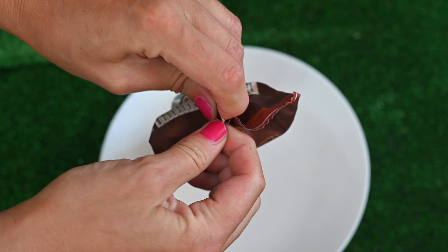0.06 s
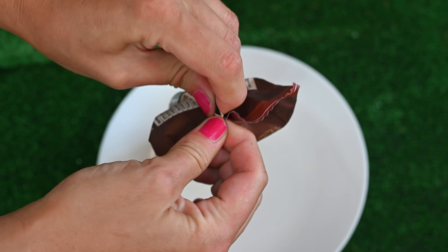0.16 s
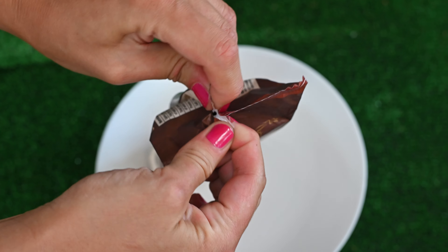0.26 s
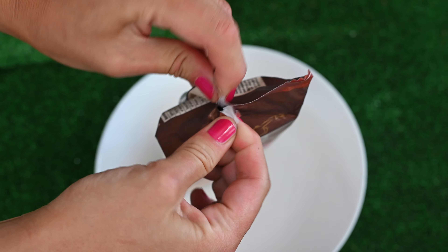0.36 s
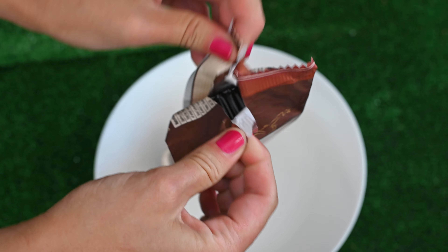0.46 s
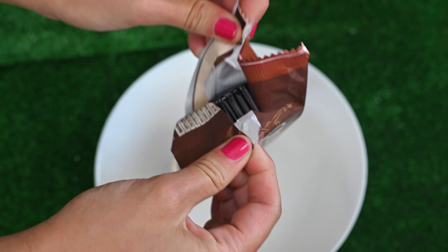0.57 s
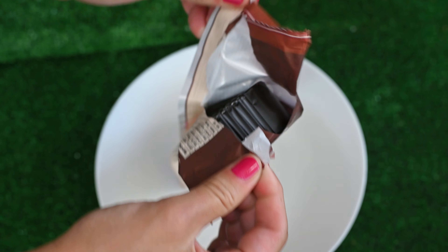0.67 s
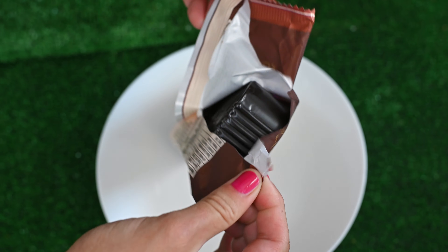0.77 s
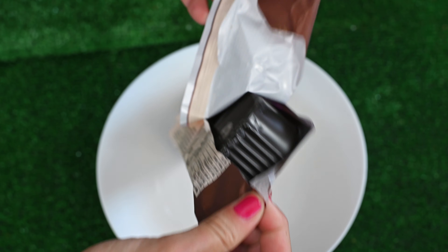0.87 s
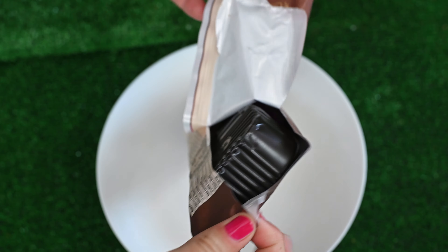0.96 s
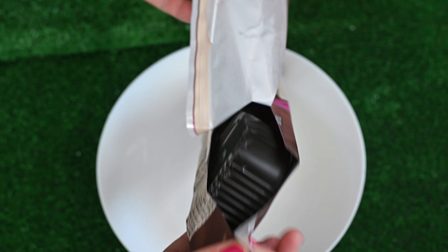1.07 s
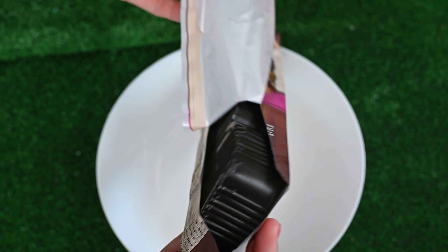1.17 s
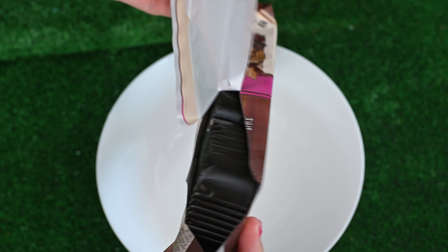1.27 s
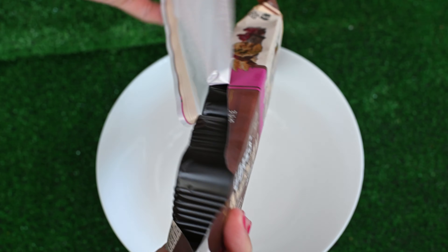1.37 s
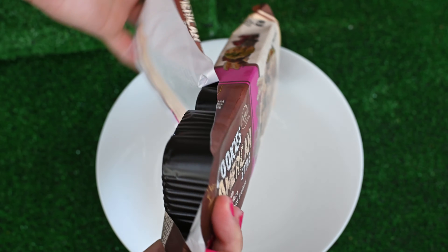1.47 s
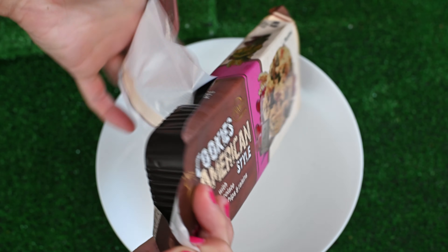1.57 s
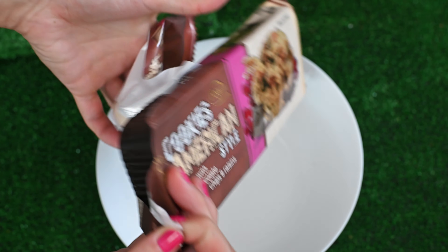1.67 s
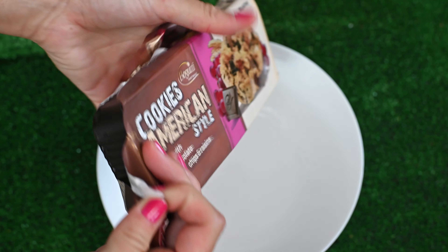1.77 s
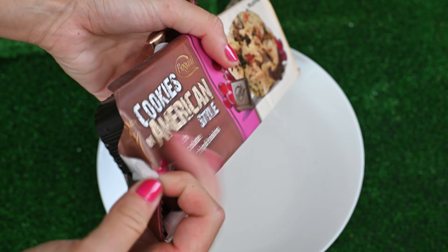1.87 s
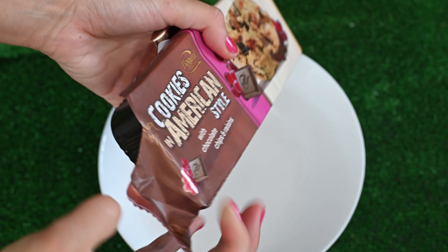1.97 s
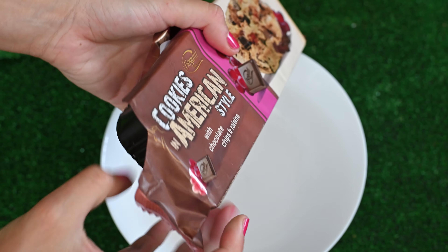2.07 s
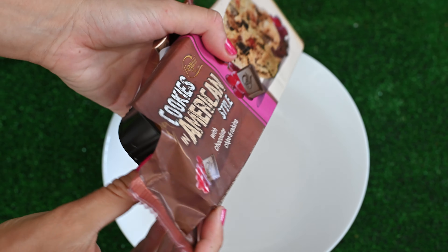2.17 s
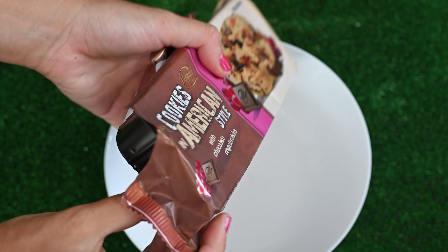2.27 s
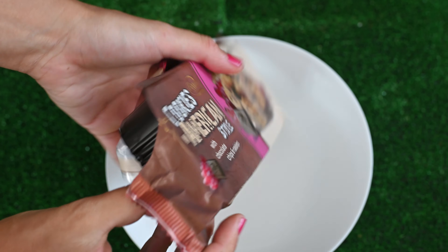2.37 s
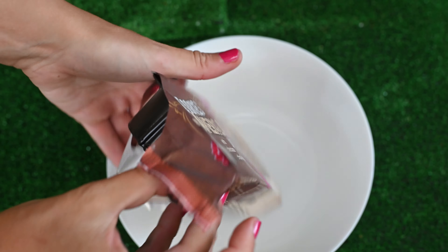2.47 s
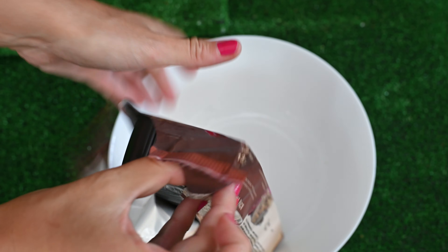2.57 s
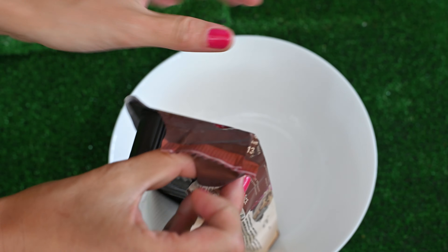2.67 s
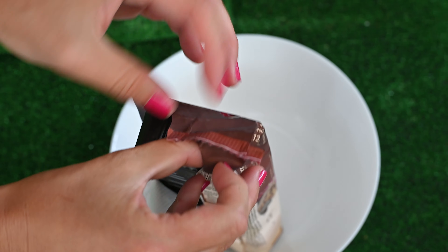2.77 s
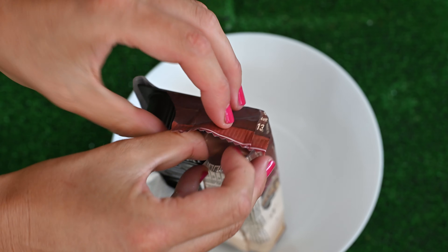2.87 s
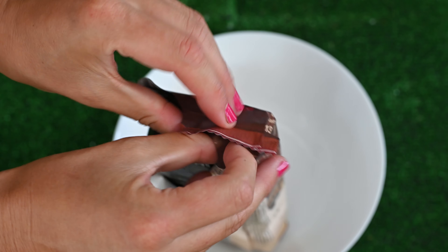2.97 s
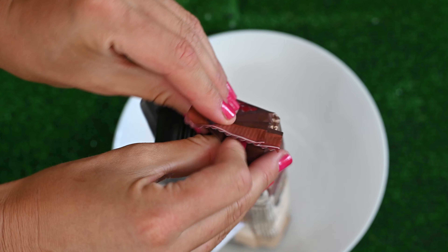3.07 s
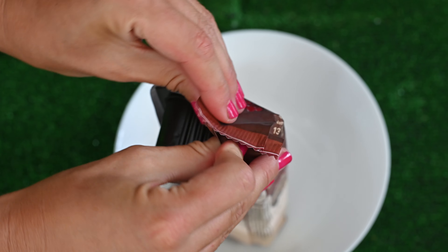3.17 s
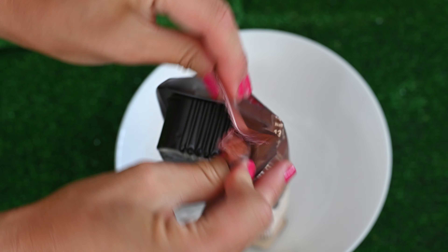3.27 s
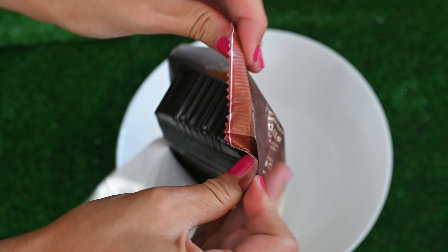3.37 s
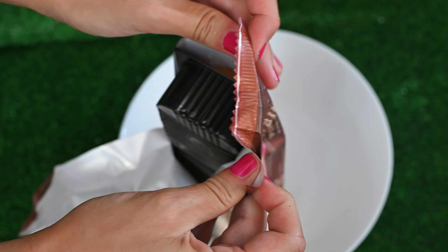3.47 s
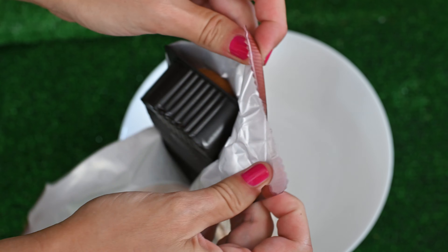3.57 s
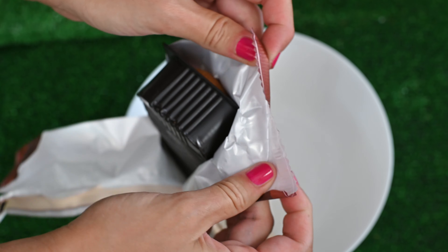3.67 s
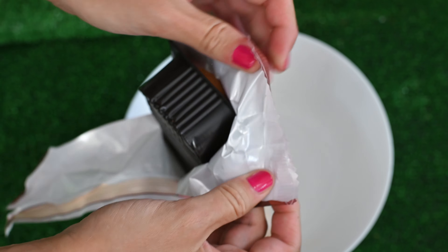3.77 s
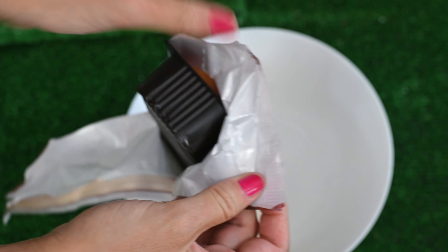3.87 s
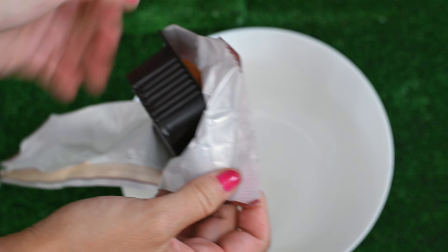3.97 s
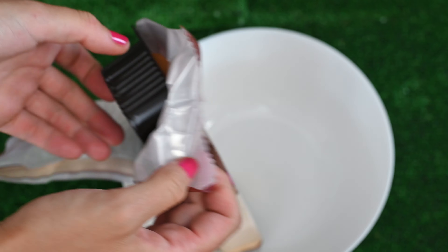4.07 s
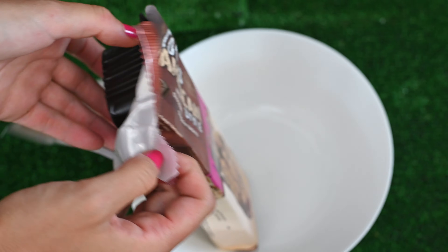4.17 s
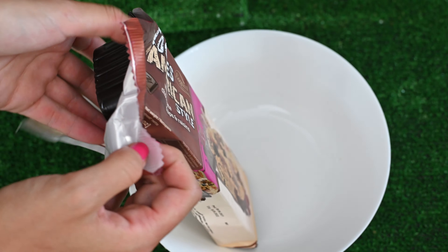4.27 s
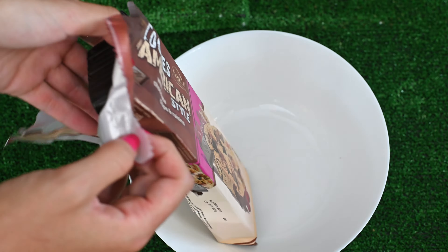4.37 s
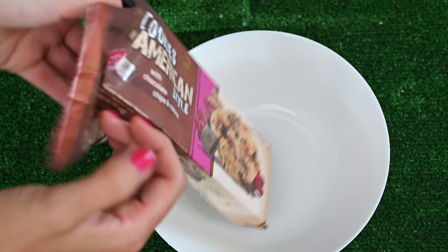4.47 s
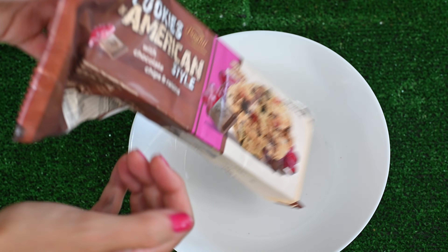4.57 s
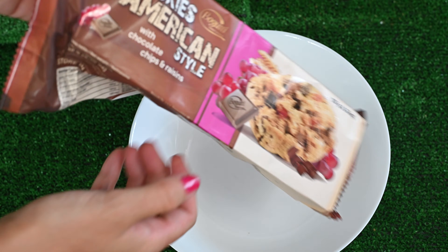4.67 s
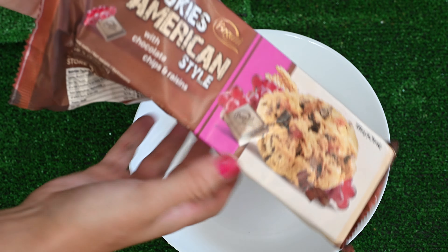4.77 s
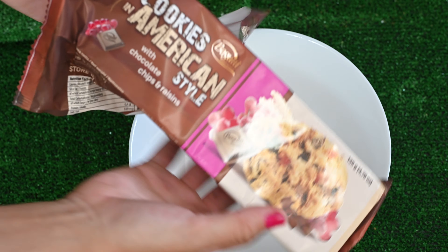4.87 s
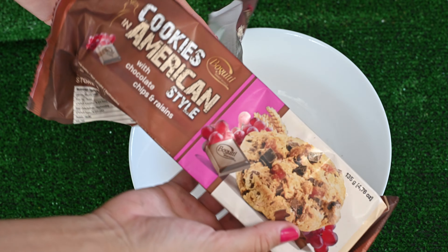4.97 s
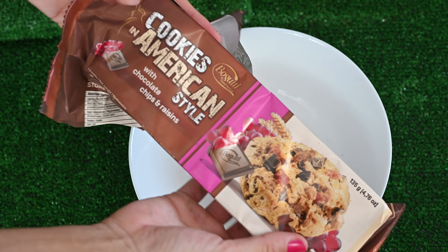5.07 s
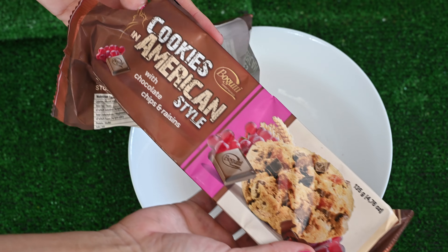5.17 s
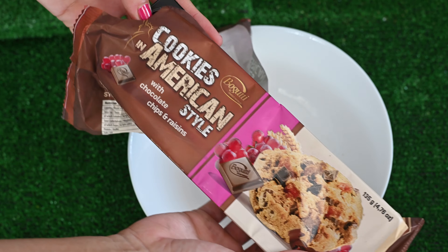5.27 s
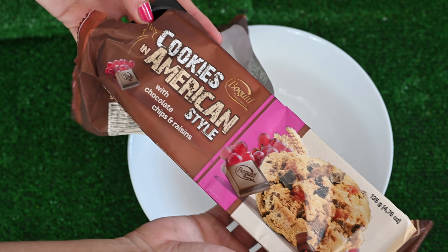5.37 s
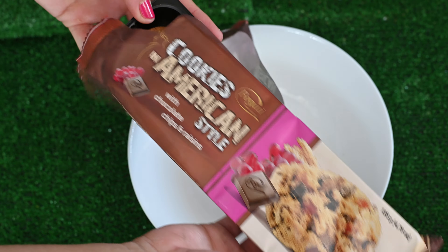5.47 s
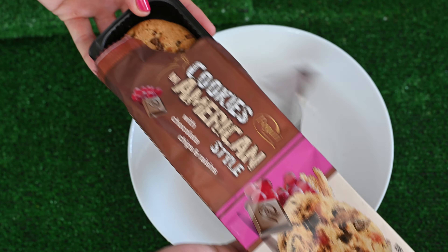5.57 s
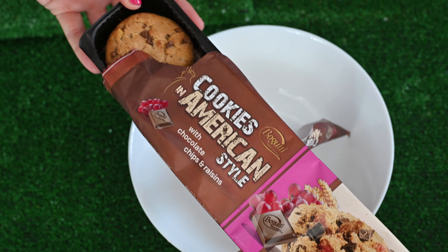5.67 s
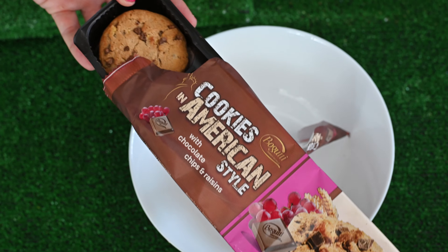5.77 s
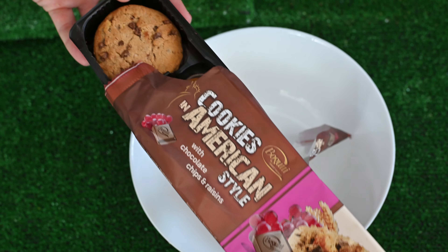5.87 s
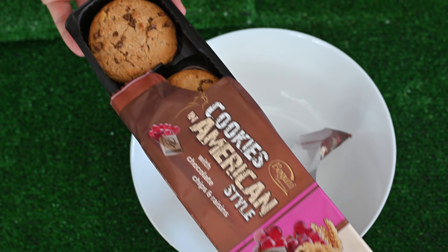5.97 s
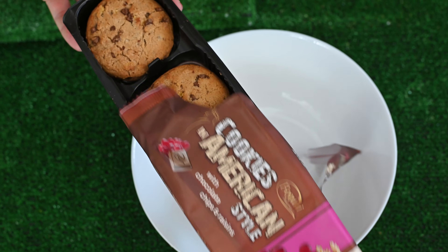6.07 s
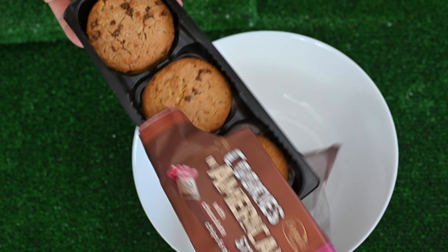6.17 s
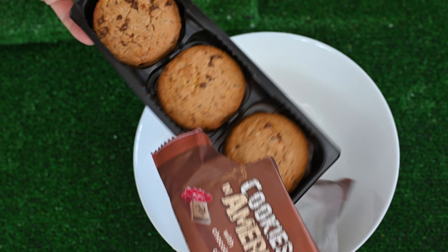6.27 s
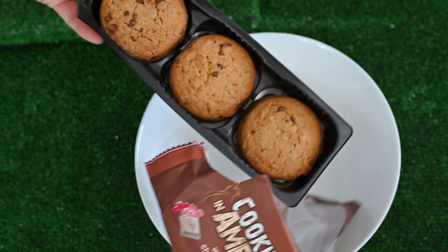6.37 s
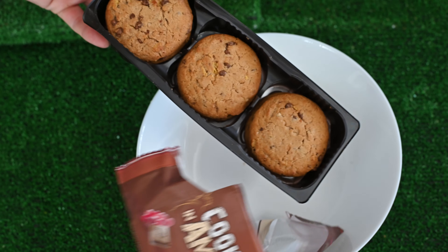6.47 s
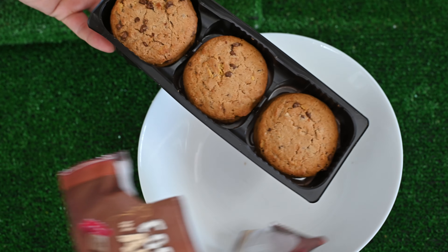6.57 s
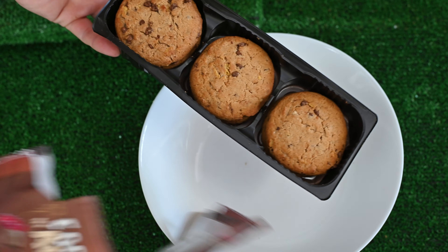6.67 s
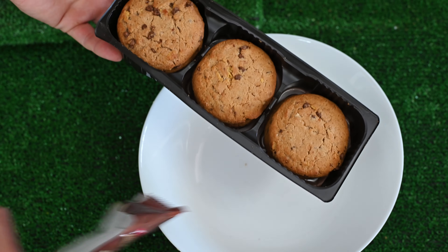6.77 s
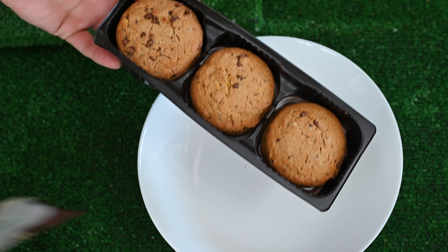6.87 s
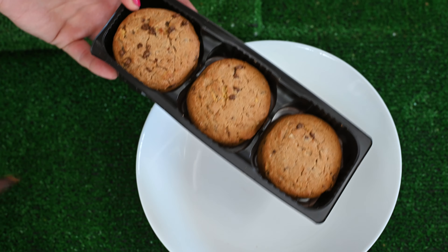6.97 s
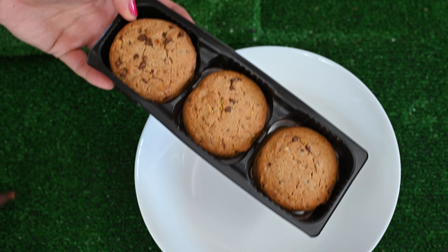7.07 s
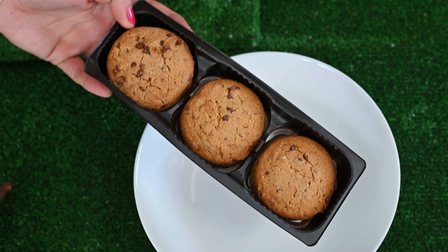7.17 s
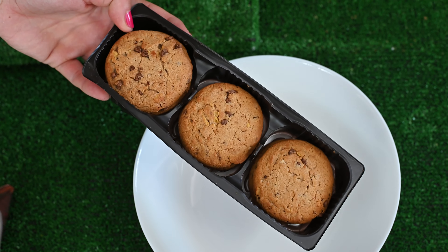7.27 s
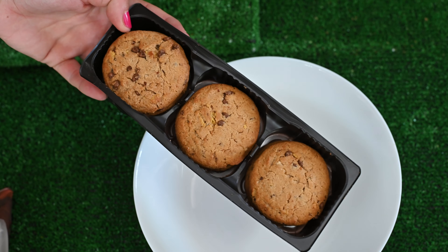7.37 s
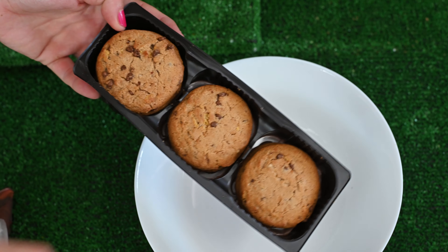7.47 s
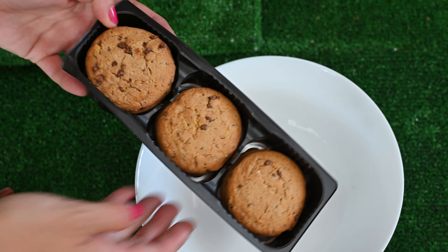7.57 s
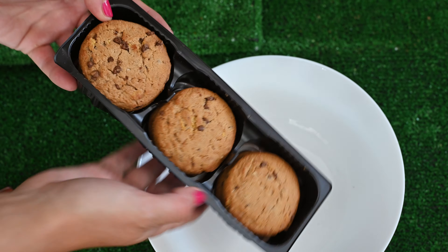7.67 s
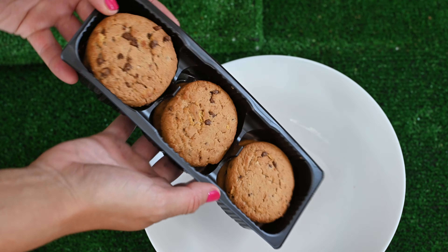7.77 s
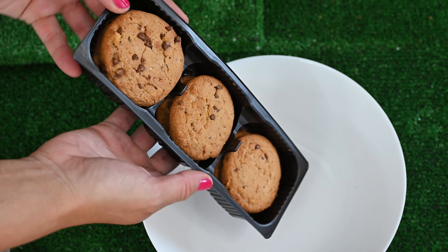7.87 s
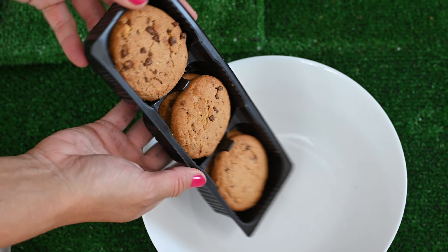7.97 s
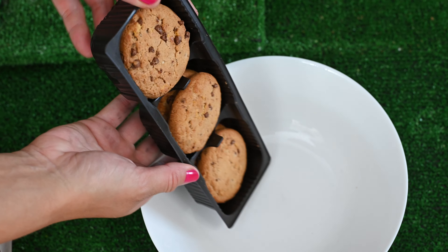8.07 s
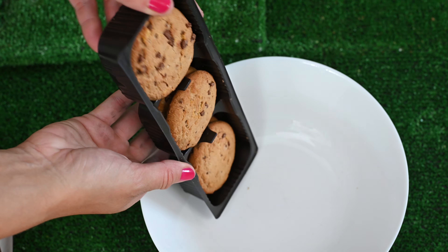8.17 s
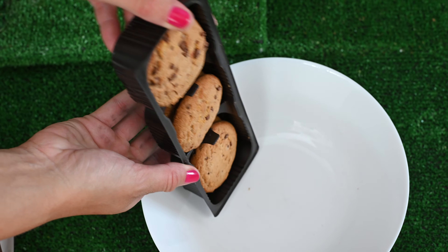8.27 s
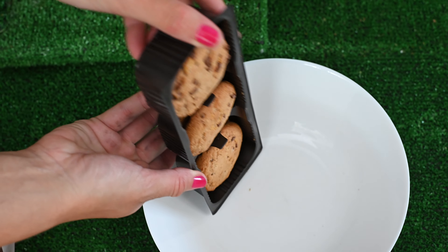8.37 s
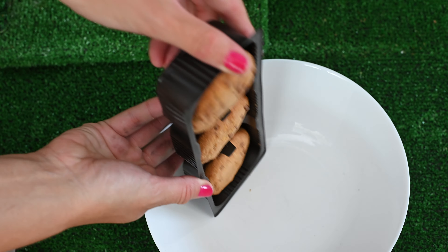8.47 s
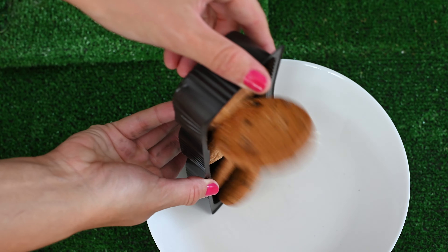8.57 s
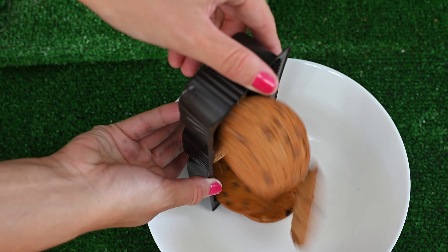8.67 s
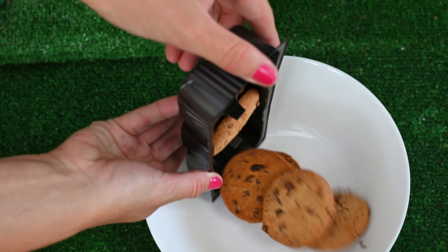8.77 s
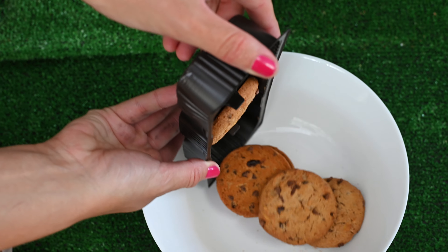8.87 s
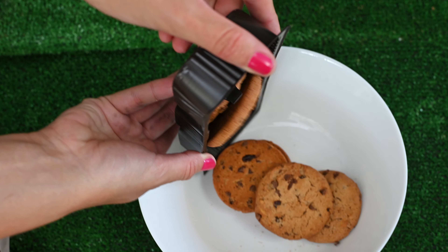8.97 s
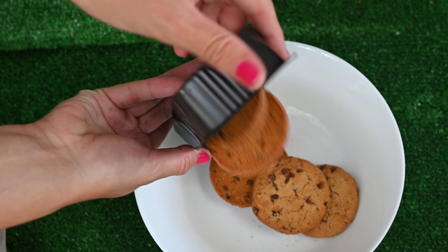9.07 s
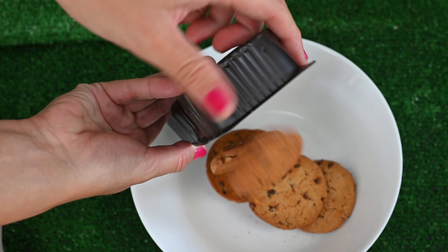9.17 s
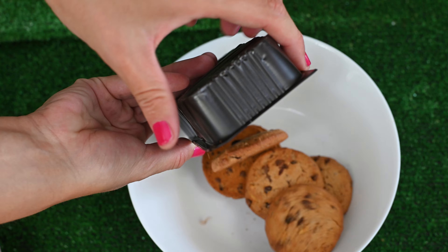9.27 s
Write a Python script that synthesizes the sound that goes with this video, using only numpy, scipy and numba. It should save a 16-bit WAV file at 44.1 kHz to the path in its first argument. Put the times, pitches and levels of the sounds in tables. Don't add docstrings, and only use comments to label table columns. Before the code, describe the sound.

Hands tear and crumple a crackly foil-lined wrapper close up, slide out a thin plastic tray, then biscuits tumble clattering into a ringing china bowl.

```python
import sys
import numpy as np
from scipy import signal
from scipy.fft import rfft, irfft
from scipy.io import wavfile
from scipy.ndimage import uniform_filter1d
from numba import njit

SR = 44100
rng = np.random.default_rng(int(sys.argv[2]) if len(sys.argv) > 2 else 0)


def dump_mix(stems):
    frames = np.atleast_2d(stems).T
    limited = np.clip(frames, -1, 1)
    pcm = np.round(limited * 32767).astype(np.int16)
    wavfile.write(sys.argv[1], SR, pcm)


def gain_from_db(level_db):
    decades = np.asarray(level_db, float) / 20
    return 10 ** decades


N = 410571

# start_s, peak_db, strongest_mode_hz, highs_db (against the peak)
TEAR_SNAPS = [(0.1353, -26.5, 4700, 1), (0.1582, -28, 3190, 2), (0.1788, -30, 5090, 7),
              (0.2038, -34, 4750, 8), (0.2348, -15.5, 4830, -4), (0.296, -5, 3040, -10.5),
              (0.3204, -24.5, 4950, 4), (0.3451, -18.5, 5430, -14), (0.3554, -12, 10500, -15),
              (0.392, -17.5, 4600, -11), (0.402, -31, 5620, 9), (0.4194, -24, 4440, -6),
              (0.455, -14.5, 5550, 3), (0.4669, -19.5, 4500, 5.5), (0.479, -22, 4650, -2),
              (0.491, -17.5, 4850, 0), (0.5138, -21.5, 3200, 1), (0.641, -20.5, 1830, -4),
              (0.6708, -18, 5800, -6), (0.7199, -13, 4530, 0), (0.746, -19, 4820, -16),
              (0.754, -11, 4500, -4), (0.7941, -13, 4860, 3), (0.8403, -12.5, 7820, -0.5),
              (0.863, -16.5, 1230, -9), (0.894, -12.5, 3900, -5), (0.9198, -9, 5300, 0.5),
              (0.957, -12.5, 1160, -14), (1.0048, -24.5, 4500, -5)]
TURN_SNAPS = [(1.0605, -19.5, 5350, 0.5), (1.1001, -18.5, 5640, -7), (1.188, -22.5, 890, -12),
              (1.2111, -11.5, 1840, -25), (1.212, -15, 4360, -13), (1.2113, -50, 900, -11),
              (1.25, -28, 5300, 0), (1.403, -25.5, 5300, 1), (1.434, -13.5, 4100, -15),
              (1.4962, -11, 2230, -6), (1.5106, -23.5, 8780, 2), (1.5507, -19, 4640, -5),
              (1.616, -21.5, 4820, 2), (1.6432, -15.5, 5100, 5.5), (1.646, -29, 5860, -14),
              (1.6715, -19.5, 5400, -3), (1.75, -17.5, 2360, -2.5), (1.8267, -20, 3780, -9),
              (1.8593, -18, 10600, -8), (1.9249, -21, 2450, -4), (1.9524, -21.5, 5460, 0),
              (2.0269, -22, 2260, -2.5), (2.2567, -27.5, 6100, 3), (2.269, -23.5, 8000, 11.5),
              (2.45, -27, 6800, 3), (2.456, -12.5, 9200, -13), (2.6066, -25.5, 2020, -2),
              (2.7113, -23, 1270, -3), (2.8212, -30, 2550, 0)]
OPEN_SNAPS = [(3.053, -21.5, 9200, -2), (3.101, -29.5, 9000, -10), (3.2406, -24, 4000, -10),
              (3.3251, -16, 5370, -4), (3.3315, -11, 4250, -1), (3.3772, -11.5, 5350, 0),
              (3.406, -15.5, 4470, 5), (3.4883, -18.5, 5850, -6), (3.5767, -33, 4930, -6),
              (3.598, -17, 5700, -1), (3.6207, -22, 5250, -8), (3.6353, -15.5, 3900, -8),
              (3.672, -19, 5600, -6), (3.7127, -16, 4140, -30), (3.7647, -23.5, 1830, -32),
              (3.83, -19.5, 10800, -5.5), (3.9016, -31.5, 4020, -41), (4.0331, -29.5, 4400, -30),
              (4.1565, -18.5, 5100, 8), (4.199, -19, 8640, -3), (4.2053, -17, 5150, -1),
              (4.319, -24.5, 4270, -2.5), (4.394, -23, 3260, -5.5), (4.43, -21.5, 1380, -19),
              (4.5978, -19, 2420, -15), (4.6423, -13, 5500, -1), (4.6499, -9, 4750, 3.5)]
PULL_SNAPS = [(4.9599, -25.5, 4900, -10), (5.05, -25.5, 2720, -43), (5.1213, -23, 5400, -28),
              (5.1498, -23.5, 5430, -5), (5.324, -20.5, 9300, 0), (5.3386, -20, 2500, -23),
              (5.3464, -18, 2960, -15), (5.4522, -23, 8850, -16), (5.5275, -14, 5230, -15),
              (5.545, -21.5, 6000, 1), (5.569, -23, 10300, 4.5), (5.702, -22.5, 5500, 0),
              (5.9087, -19.5, 6440, -5.5), (5.958, -24.5, 1410, -5), (6.0118, -27, 9700, 3),
              (6.134, -32.5, 9000, 5), (6.1927, -26, 1410, -1), (6.2108, -13.5, 1480, -7),
              (6.3199, -13.5, 6420, -8)]
TRAY_SNAPS = [(6.463, -34.5, 1830, -54), (6.537, -29, 1760, -76), (6.808, -43.5, 9350, 12.5),
              (6.8625, -28, 1180, -16), (6.865, -42, 5260, -2), (6.9055, -28.5, 890, -16),
              (6.952, -43, 900, -36), (6.978, -26, 4070, -10), (7.08, -40, 895, -20),
              (7.175, -29, 2800, -64), (7.279, -35.5, 3200, -3), (7.32, -33, 1850, -7),
              (7.583, -19.5, 2200, -9), (7.7324, -17, 1890, -8), (7.772, -32.5, 1390, -10),
              (7.8355, -30, 1820, -34), (7.8488, -22.5, 5700, -14), (7.906, -14, 2330, -13),
              (8.0372, -24.5, 2530, -13), (8.1723, -38.5, 3680, -6), (8.554, -39, 5600, -22),
              (8.6597, -27, 2650, -1.5), (8.6816, -24.5, 2280, -10), (8.685, -28, 1820, -17),
              (8.69, -38, 1390, -17), (8.694, -27, 1080, -19), (9.107, -42, 2300, -8),
              (9.258, -3, 5800, -7), (9.261, -6, 1900, -10)]
# start_s, peak_db (before TICK_DB), strongest_mode_hz, highs_db
TICKS = [(0.0097, -24.0, 5640, 2.5), (0.0218, -21, 7750.0, -4.0), (0.0598, -18, 7800, -5),
         (0.0842, -25, 9800, 6), (0.1466, -30, 5560.0, 5), (0.193, -23, 3320.0, 6),
         (0.2137, -21, 2560.0, 8), (0.3755, -16, 1300, -20.0), (0.5153, -13, 3290.0, -4.0),
         (0.5383, -10.5, 2400, -10), (0.5627, -12, 3680, -2), (0.6907, -10, 1200, -6),
         (0.8176, -18, 4780, -4), (0.825, -6.5, 2380, -8.0), (0.883, -19, 1330, -8.0),
         (0.9901, -16, 2670.0, 0), (1.2482, -17, 4600, -13), (1.3021, -16, 2220.0, -0.5),
         (1.4841, -17, 5450.0, -9.0), (1.526, -20, 1160.0, -21.0), (1.534, -17.0, 4350, -11.0),
         (1.5441, -24, 3790.0, -15.0), (1.585, -14, 1150, -7), (1.594, -14.5, 8480.0, -7),
         (1.671, -20, 1980, -17), (1.7396, -21, 1660, -6), (1.9321, -15.5, 2410.0, -7.0),
         (2.2197, -24, 990.0, -28), (2.297, -12.5, 1410, -25), (2.415, -15, 1244, -7),
         (2.5, -23.0, 3010.0, -12), (2.5055, -17, 1080, -22), (2.5244, -14, 1960.0, -15),
         (2.6272, -19, 1140, -5.0), (2.6388, -15, 720, -29), (2.8106, -24, 1090, -23),
         (2.92, -23.5, 1910, -15), (2.9875, -23, 1340, -13), (3.012, -26, 1260, -21.0),
         (3.1154, -21.5, 1880, -9.0), (3.1683, -22, 4630, -6.0), (3.179, -20.5, 1980, -19),
         (3.1886, -24, 1230.0, -20), (3.2794, -16.5, 1270, 1), (3.303, -13, 5400, -6),
         (3.3156, -15, 5770.0, 0), (3.354, -9, 5320.0, -1), (3.3958, -26, 8870.0, -5),
         (3.4268, -10, 860, -8.0), (3.467, -18.5, 860.0, 2), (3.5336, -19.5, 960, -3),
              (3.5605, -23, 870, -24), (3.5873, -12.5, 745, 0), (3.5926, -18, 915, -17.0),
              (3.737, -19, 750.0, 5.5), (3.7741, -21, 5810.0, -16), (3.7839, -30, 1790.0, -25.0),
              (3.811, -19.5, 5750, -7), (4.107, -26, 4480.0, -2), (4.118, -29, 5580.0, -3),
              (4.1368, -28, 4840.0, 7), (4.4456, -19.5, 3870, 2.5), (4.6354, -16, 2340, -6.0),
              (4.968, -15, 3760, -7), (5.0028, -22.5, 2970, -8), (5.083, -17, 1530, -14.0),
              (5.128, -15.5, 3060.0, -14), (5.189, -22, 1230.0, -18.0), (5.2028, -15, 9700, -9),
              (5.2158, -25, 3810.0, 2), (5.272, -16, 2700, -37), (5.354, -16, 4130.0, -21),
              (5.4129, -20, 6300, -1), (5.473, -15.5, 2240, -16), (5.5098, -10, 10250.0, -7),
              (5.623, -14, 2000, 4), (5.6368, -17.5, 6050, 6), (5.6717, -16.5, 2270, -3),
              (5.6923, -20, 4650, -1), (5.9537, -27, 2090, -5), (6.202, -17, 2200.0, 5),
              (6.2344, -14.5, 2040, -1), (6.2794, -27, 3130, -23), (7.4317, -28, 3040.0, -29),
              (8.0128, -32, 800, -11), (8.6973, -22, 1070, -18),
         (0.4735, -6, 3350, -2),
    (0.486, -14, 4120, 4),
    (0.5877, -19, 4780, -4),
    (0.652, -20, 5600, -4),
    (.7421, -12, 6100, -3.5),
    (0.8613, -4, 4650, -7),
    (0.9157, -16.5, 1320, -5),
    (1.4272, -14.5, 9600, -1.5),
    (3.6527, -11.5, 3190, -3),
]
# firmest_s, rustle_db, rise_s, fall_s (times for 20 dB), lows_db
WRAP_GRIPS = [(.12, -44, 0.58, 0.58, -13), (.32, -48, 0.075, 0.68, -28), (.48, -34, 0.017, 0.2, -9),
              (.85, -36, 0.67, 0.3, 0), (1.24, -49, 0.76, 0.94, 1.5), (1.51, -38.5, 0.22, 0.11, -4.5),
              (1.849, -27.5, 0.064, 0.035, -1), (1.98, -38.5, 0.26, 0.084, -5),
              (2.199, -46, 0.011, 0.7, -1.5), (2.48, -41, 0.22, 0.12, -10), (2.64, -41.5, 0.29, 0.2, 3.5),
              (3.08, -44.5, 0.13, 1, -5.5), (3.368, -26, 0.049, 0.09, -1.5),
              (3.65, -44.5, 0.14, 0.051, 7.5), (4.06, -56.5, 0.75, 0.13, 4), (4.16, -41.5, 0.039, 0.23, -4),
              (4.501, -41.5, 0.24, 0.16, -4), (5.14, -46, 0.49, 0.057, -4.5), (5.34, -42.5, 0.35, 0.1, -8),
              (5.562, -34, 0.16, 0.4, -6.5), (6.211, -39.5, 0.72, 0.25, -5), (6.37, -48, 0.13, 0.074, -10)]
# firmest_s, rustle_db, rise_s, fall_s, lows_db
TRAY_GRIPS = [(6.85, -64, 0.2, 0.25, -3), (7.1, -52.5, 0.71, 0.34, 6), (7.36, -47.5, 0.21, 0.4, 1),
              (7.76, -46, 0.077, 0.1, -13), (7.92, -49.5, 0.25, 0.14, -4), (8.04, -52, 0.074, 0.067, 5),
              (8.3, -57, 0.6, 0.3, 0.5), (8.57, -45, 0.11, 0.093, 1), (8.68, -45, 0.063, 0.066, -7),
              (8.757, -30, 0.013, 0.011, 3), (8.78, -45, 0.35, 0.93, 1), (9.11, -38.5, 0.063, 0.084, 1),
              (9.175, -36.5, 0.083, 0.032, 3), (9.27, -48, 0.11, 0.096, -6)]
# band_hz, level_db
SHEET = [(170, -17), (300, -12.5), (550, -12), (1000, -8.5), (1800, -5.5), (3000, -4.5), (4800, -1),
         (7500, -1.5), (11000, -3), (14500, -46)]
# frequency_hz, side_share (side against mid amplitude)
SIDE_SHARE = [(60, 0.61), (300, 0.27), (1000, 0.25), (5000, 0.26), (15000, 0.73)]
# start_s, knock_db, top_mode_db (a flat landing chokes it)
BLOWS = [(6.712, -63.5, 0), (6.808, -50, 0), (8.741, -17, 1.5), (8.7835, -16, 0), (8.801, -14, -14),
         (8.812, -26, -14), (8.824, -27, 3), (8.867, -27, -2), (8.879, -18, -8), (8.891, -30, 1.5),
         (9.231, -32, -8)]
# mode_hz, level_db, t60_s
BISCUIT = [(300, -8, .03), (750, 3, .045), (1050, -4, .03), (1550, -6, .025), (2430, 1, .035)]
# start_s, mode_hz, level_db
PINGS = [(6.712, 3775, -60), (6.712, 4820, -67), (6.808, 3775, -49), (6.808, 4820, -62), (6.808, 2853, -63),
         (8.79, 4167, -43), (8.806, 367, -20.5), (8.801, 4820, -41), (8.808, 803, -26), (8.81, 1362, -40),
         (8.812, 3775, -39), (8.81, 2046, -33), (8.82, 2853, -45), (8.822, 4167, -38), (8.881, 2853, -35),
         (8.889, 4820, -41)]
# mode_hz, t60_s
BOWL = [(367, 1.35), (803, 2.5), (1362, 2.5), (2046, 1.05), (2853, .7), (3775, .38), (4167, .14),
        (4820, .28)]
# frequency_hz, pan_db (left minus right)
BOWL_PAN = [(367, -6.5), (803, -1.5), (1400, 6), (3000, -0.5), (10000, 4.5)]
# start_s, level_db
GLINTS = [
    (8.742, -34),
    (8.783, -32),
    (8.8, -28),
    (8.822, -35),
    (8.849, -42),
    (8.865, -37),
    (8.879, -36),
    (8.889, -35),
]
# mode_hz, level_db, t60_s
RIM = [(7230, -15, .17), (7467, -11, .17), (8220, -11, .13), (8759, -9, .12), (9846, -12, .12),
       (10240, -9, .1), (11650, -12, .12), (12800, -13, .08), (13390, -14, .1), (14580, -15, .12)]
# start_s, peak_db, pitch_hz
THUDS = [(0.745, -44, 146), (1.578, -37, 105), (1.621, -41.5, 152), (1.835, -32, 101), (3.666, -41.5, 119),
         (4.526, -44, 125), (8.741, -23.5, 126), (8.789, -18.5, 107), (8.891, -25, 109.4),
         (8.948, -26.5, 105), (9.041, -35, 99), (9.236, -20.5, 113), (9.29, -24, 115)]
SWAY_START_S = [8.795, 9.236]
SWAY_LEVEL_DB = [-31.5, -38.5]
# start_s, peak_db
SLIPS = [(3.943, -44), (3.967, -44), (3.977, -45), (3.997, -39.5), (4.024, -39), (4.047, -41), (4.066, -37),
         (4.087, -43), (4.107, -44), (4.119, -38), (4.148, -37), (4.175, -37)]
# frequency_hz, density_db (per Hz)
AIR = [(20, -2.5), (60, -9), (90, 1), (250, -12), (750, -12), (1600, -33), (5000, -42), (9000, -47),
       (15000, -52)]
# line_hz, width_hz, density_db (per Hz)
MAINS = [(48.8, 6, 8.5)]

TICK_DB, SNAP_TINT_DB = -9.5, 3
TINY_PER_S, TINY_DB, TINY_SPREAD_DB, RUB_DB = 160, 9.5, 2.8, -1.5
SLIDE_FROM_S, SLIDE_CALM_DB = 6.6, -4.5
REST_DB, REST_LOWS_DB = -80, 16
HAND_PAN_DB = -1.1
SWAY_HZ = 61.2
SLIP_HZ, SLIP_T60_S = 456, 0.027
ROOM_T60_S, ROOM_DB = 0.37, -14
AIR_DB = -53.5
HUM_HZ, HUM_DB, HUM_TURN_RAD = 50.3, -56.5, 1.25
SOFT_TREBLE_HZ, TOP_HZ = 12340, 15800


def creases():
    events = TEAR_SNAPS + TURN_SNAPS + OPEN_SNAPS + PULL_SNAPS + TRAY_SNAPS
    events = events + [(s, db - 8.5, 1100, -24) for s, db, *_ in BLOWS]
    ticks = TICKS
    events = events + [(s, db + TICK_DB, hz, highs) for s, db, hz, highs in ticks]
    s, db, main_hz, highs_db = np.transpose(events)

    noise = np.sign(rng.standard_normal((2, 2, N)))
    u = rng.random((TINY_PER_S * N // SR, 3))
    tiny_s = np.sort(u[:, 0]) * N / SR
    tiny_db = TINY_DB - TINY_SPREAD_DB * np.log(u[:, 1] + 1 / 30)
    tiny_db = tiny_db + SLIDE_CALM_DB * (tiny_s > SLIDE_FROM_S)
    facet_octave = 4 * (u[:, 2] - .5)
    t, grip_db, lows_db = handling()
    snap_tint = rng.standard_normal((len(s), len(SHEET)))
    tiny_tint = rng.standard_normal((len(u), len(SHEET)))

    out = ring(s, main_hz, .012 * (main_hz / 3000) ** -.4, db - 7, HAND_PAN_DB, 0.)
    other_hz = np.clip(main_hz * 2 ** (.7 * snap_tint[:, :2].T), 600, 11000)
    out = out + ring(s, other_hz, .014 * (other_hz / 3000) ** -.4, db - 13, HAND_PAN_DB, 0.)

    for k, (hz, band_db) in enumerate(SHEET):
        low = np.clip(np.log2(1600 / hz), 0, 1)
        high = np.clip(np.log2(hz / 4500) / 1.25, 0, 1)
        deep = max(np.log2(900 / hz), 0)
        near_db = 8 * np.exp(-np.log2(hz / main_hz) ** 2 / 0.12)
        facet_db = 9 * np.exp(-(np.log2(hz / 3000) - facet_octave) ** 2) - 4
        t60 = 0.0082 * (hz / 3000) ** -.4
        handled_db = grip_db + low * (lows_db + 3.5)

        loud_db = db - .8 - 7 * deep + near_db + high * (highs_db + 10.0)
        loud = release(s, loud_db + SNAP_TINT_DB * snap_tint[:, k], t60)
        faint_db = np.interp(tiny_s, t, handled_db) + tiny_db + facet_db
        tiny = release(tiny_s, faint_db + 2.2 * tiny_tint[:, k], 0.45 * t60)
        rub = gain_from_db(np.interp(np.arange(N) / SR, t, handled_db) + RUB_DB)

        edges_hz = [hz / 1.35, min(hz * 1.35, 16000)]
        band = signal.butter(N=2, Wn=edges_hz, btype="band", fs=SR, output="sos")
        gain = gain_from_db(band_db) * np.sqrt(SR / 8 / hz)
        source = (loud + tiny + rub) * stereo(noise[k % 2], shape(SIDE_SHARE, hz))
        out = out + gain * signal.sosfilt(band, source)
    return out * gain_from_db(np.array([[HAND_PAN_DB / 2], [-HAND_PAN_DB / 2]]))


def handling():
    t = np.arange(0, N / SR + .01, .002)
    s, db, rise_s, fall_s, lows_db = np.transpose(WRAP_GRIPS + TRAY_GRIPS)[:, :, None]
    away = np.where(t < s, (s - t) / np.maximum(rise_s, .01), (t - s) / np.maximum(fall_s, .01))
    power, rest = gain_from_db(db - 20 * away) ** 2, gain_from_db(REST_DB) ** 2
    total = power.sum(axis=0) + rest
    mean_lows_db = ((power * lows_db).sum(axis=0) + rest * REST_LOWS_DB) / total
    return t, 10 * np.log10(total), mean_lows_db


def release(s, db, t60):
    jumps = np.bincount((s * SR).astype(int), gain_from_db(db), N)[:N]
    crack, shiver = (signal.lfilter([1], [1, -np.exp(-np.log(1000) / (decay_s * SR))], jumps)
                     for decay_s in (t60, 7.2 * t60))
    return uniform_filter1d(crack + 0.28 * shiver, size=27)


def stereo(noise, side):
    mid, apart = noise
    return (mid + np.clip(side, 0, 1) * apart * np.array([[1], [-1]])) / np.sqrt(1 + side ** 2)


def ring(s, hz, t60, db, pan_db, lag_s):
    values = np.broadcast_arrays(s, hz, t60, db, pan_db, lag_s)
    s, hz, t60, db, pan_db, lag_s = (a.ravel() for a in values)
    out = np.zeros((2, N))
    decay = np.log(1000) / (np.maximum(t60, 1e-3) * SR)
    pole = np.exp(2j * np.pi * np.minimum(hz, .45 * SR) / SR - decay)
    turn = np.exp(1j * np.pi * hz * lag_s)
    start = (np.maximum(s, 0) * SR).astype(np.int64)
    add_modes(out, start, pole, gain_from_db(db + pan_db / 2) * turn, gain_from_db(db - pan_db / 2) / turn)
    return out


@njit
def add_modes(out, start, pole, left, right):
    for k in range(len(start)):
        z = 1 + 0j
        for i in range(start[k], out.shape[1]):
            out[0, i] += (z * left[k]).imag
            out[1, i] += (z * right[k]).imag
            z *= pole[k]
            if abs(z.real) + abs(z.imag) < 1e-3:
                break


def shape(table, hz):
    f, v = np.transpose(table)
    return np.interp(np.log(hz), np.log(f), v)


def biscuits():
    s, knock_db, top_db = np.transpose(BLOWS)[:, :, None, None]
    hz, db, t60 = np.transpose(BISCUIT)
    g = rng.standard_normal((2, len(s), 3, len(hz)))
    bounce = np.arange(3)[:, None]
    contact_s = s + .004 * bounce + .0005 * abs(g[1])
    mode_db = db + top_db * (hz > 2000)
    level_db = knock_db + mode_db - 4 - 7 * bounce + 2 * g[1]
    return ring(contact_s, hz * (1 + .02 * g[0]), t60, level_db, HAND_PAN_DB, 0.)


def china():
    ping_s, ping_hz, ping_db = np.transpose(PINGS)
    bowl = ring(ping_s, ping_hz, shape(BOWL, ping_hz), ping_db, shape(BOWL_PAN, ping_hz), 0.)
    hz, db, t60 = np.transpose(RIM)
    s, glint_db = np.transpose(GLINTS)[:, :, None]
    glint_db = glint_db + 4.5 * rng.standard_normal((len(s), len(hz)))
    rim = ring(s, hz, 0.61 * t60, db + glint_db, shape(BOWL_PAN, hz), 0.)
    return bowl + rim


def table():
    s, db, hz = np.transpose(THUDS)
    thuds = ring(s, hz, .2, db, -1.5, 1.5e-3)
    sway = ring(SWAY_START_S, SWAY_HZ, 1.2, SWAY_LEVEL_DB, 1.5, 4.5e-3)
    return thuds + sway


def fingertip():
    s, db = np.transpose(SLIPS)
    pop_hz = SLIP_HZ * (1 + 0.13 * rng.standard_normal(len(s)))
    return ring(s, pop_hz, SLIP_T60_S, db, HAND_PAN_DB, 0.)


def room(x):
    t = np.arange(int(.35 * SR)) / SR
    tail = signal.lfilter([1], [1, -.4], rng.standard_normal((2, len(t))))
    tail = tail * np.exp(-np.log(1000) * t / ROOM_T60_S) * np.clip(t / 0.0016, 0, 1)
    tail = gain_from_db(ROOM_DB) * tail / np.sqrt(np.sum(tail ** 2) / 2)
    return x + signal.fftconvolve(x, tail, axes=1)[:, :N]


def air():
    hz = np.fft.rfftfreq(N, 1 / SR) + 1
    drone = sum(gain_from_db(db) / (1 + ((hz - f) / width) ** 2) for f, width, db in MAINS)
    mid, side = rfft(rng.standard_normal((2, N))) * (gain_from_db(shape(AIR, hz)) + drone)
    x = irfft(mid + 2.67 * shape(SIDE_SHARE, hz) * side * np.array([[1], [-1]]), N)
    phase = 2 * np.pi * HUM_HZ * np.arange(N) / SR + np.array([[HUM_TURN_RAD], [0]])
    return x * gain_from_db(AIR_DB) / x.std() + gain_from_db(HUM_DB) * np.sin(phase)


def scene():
    return room(creases() + biscuits() + fingertip()) + china() + table() + air()


def roll_off(x):
    return signal.sosfilt(signal.butter(12, 17020, fs=SR, output="sos"), x)


def record(dry):
    x = signal.sosfilt(signal.ellip(8, .2, 70, TOP_HZ, fs=SR, output="sos"), dry)
    x = signal.sosfilt(signal.butter(N=2, Wn=SOFT_TREBLE_HZ, fs=SR, output="sos"), x)
    return roll_off(np.clip(x, -1, 1))


dry = scene()
out = record(dry)
dump_mix(out)
```